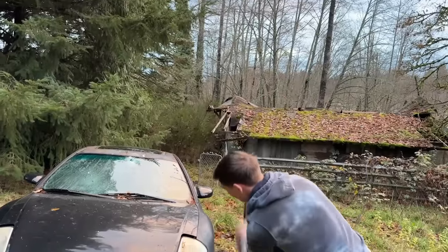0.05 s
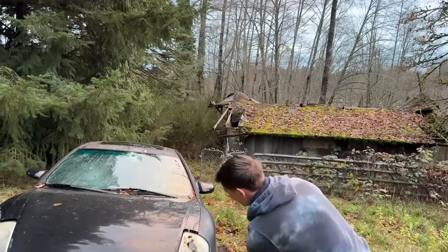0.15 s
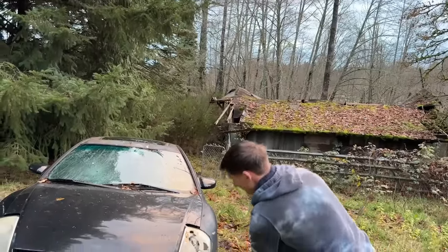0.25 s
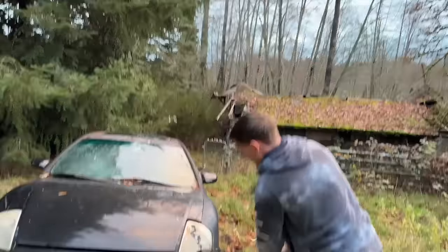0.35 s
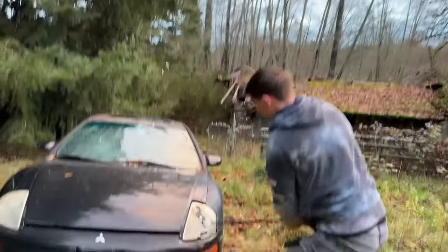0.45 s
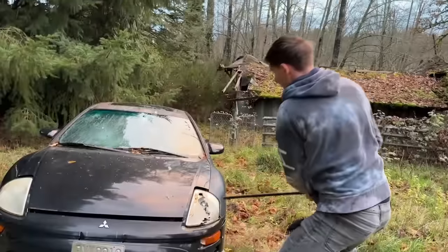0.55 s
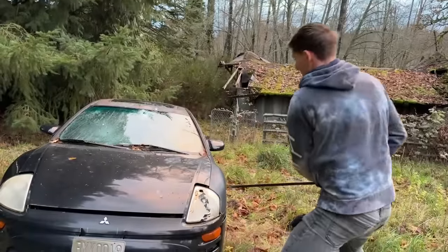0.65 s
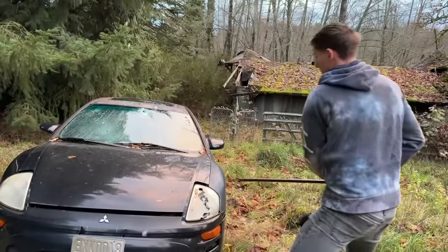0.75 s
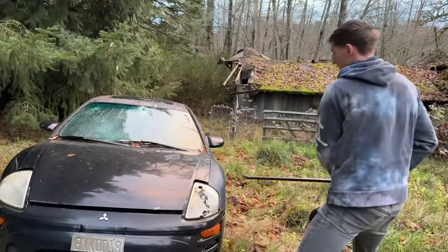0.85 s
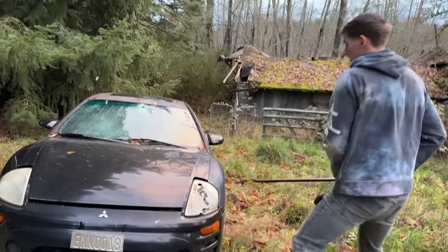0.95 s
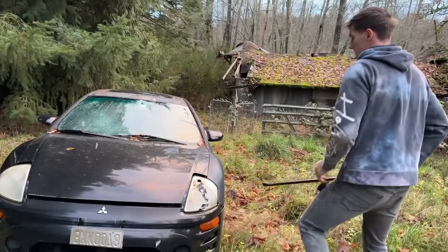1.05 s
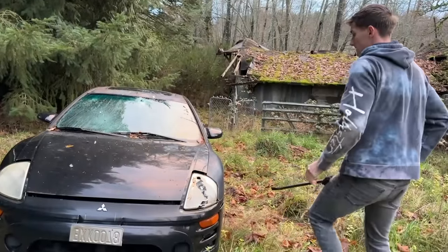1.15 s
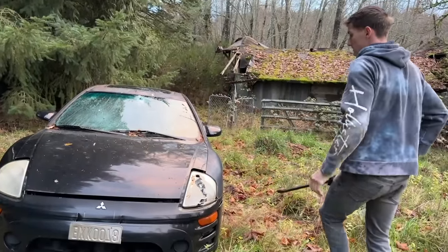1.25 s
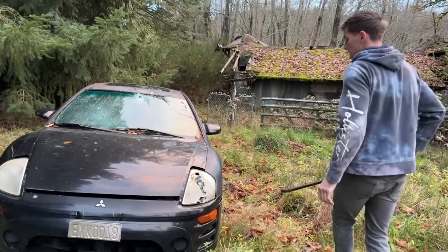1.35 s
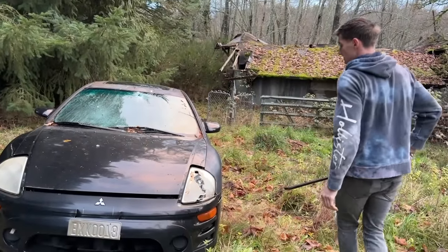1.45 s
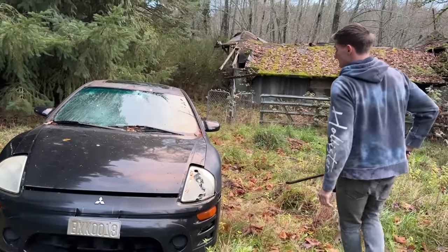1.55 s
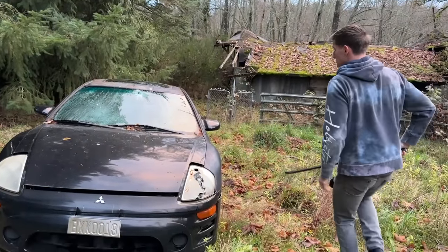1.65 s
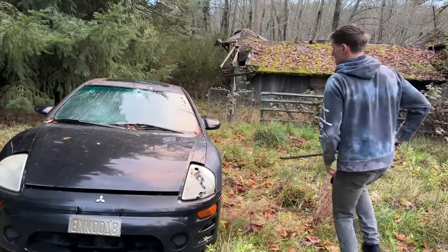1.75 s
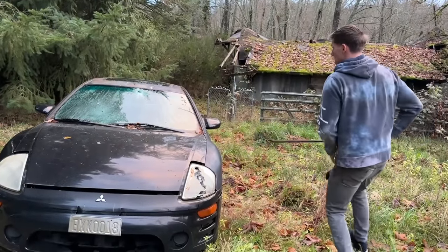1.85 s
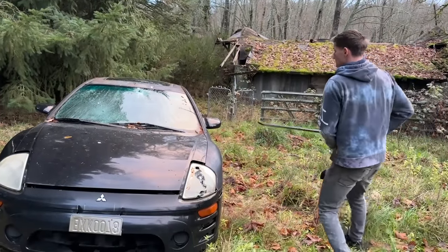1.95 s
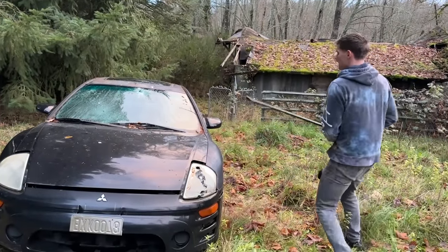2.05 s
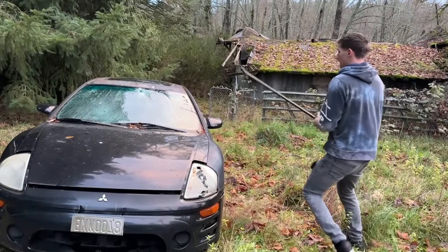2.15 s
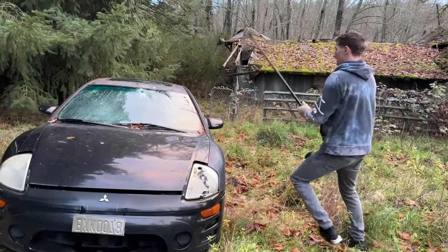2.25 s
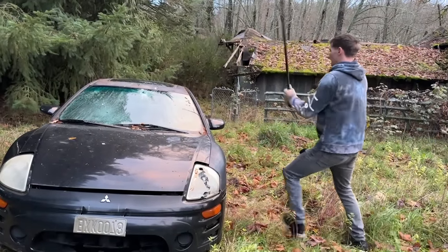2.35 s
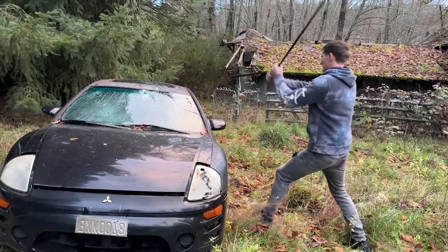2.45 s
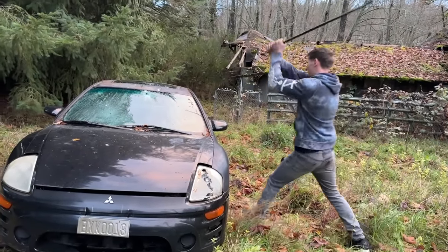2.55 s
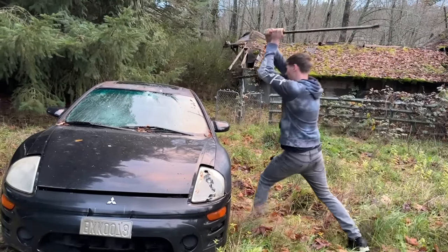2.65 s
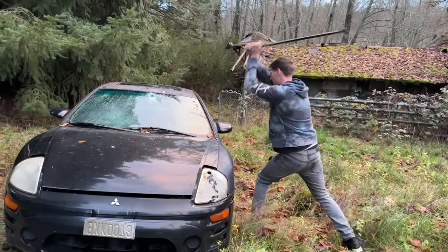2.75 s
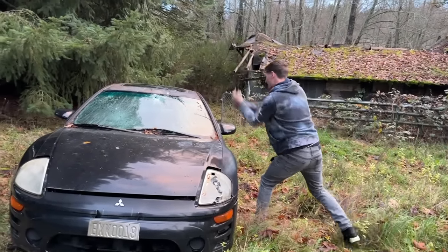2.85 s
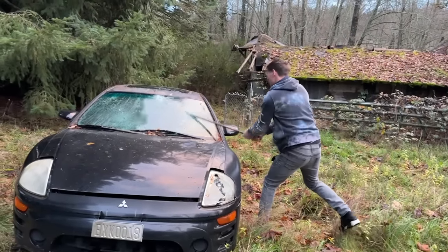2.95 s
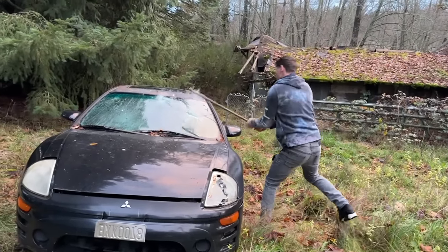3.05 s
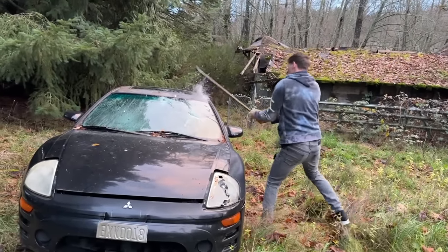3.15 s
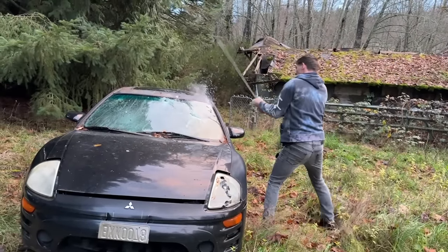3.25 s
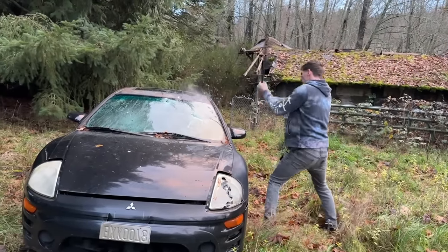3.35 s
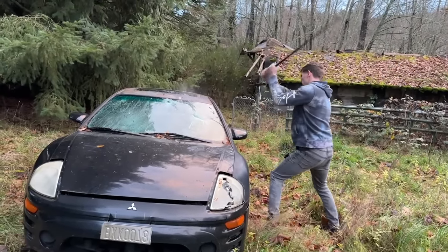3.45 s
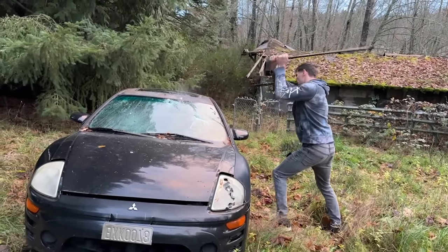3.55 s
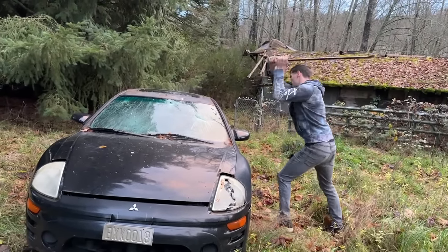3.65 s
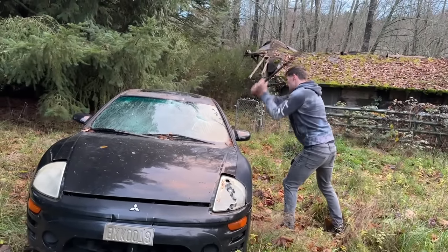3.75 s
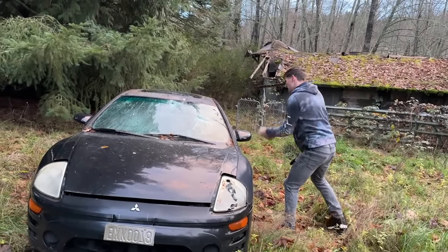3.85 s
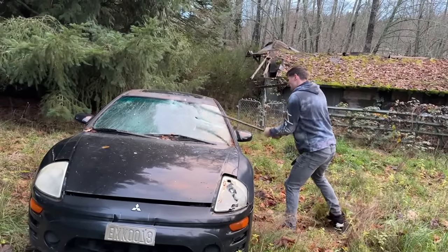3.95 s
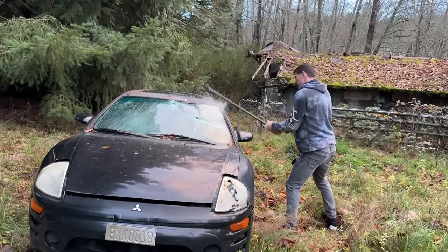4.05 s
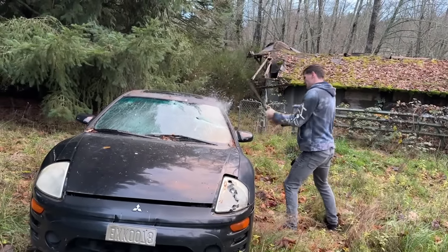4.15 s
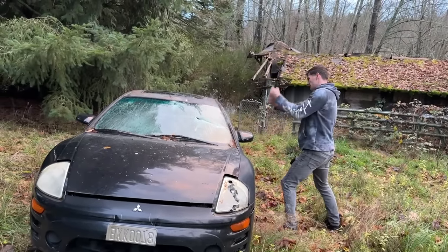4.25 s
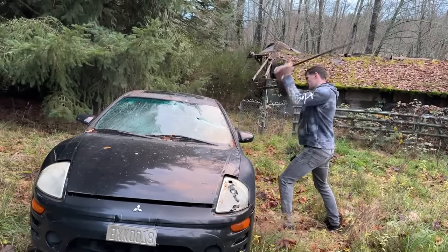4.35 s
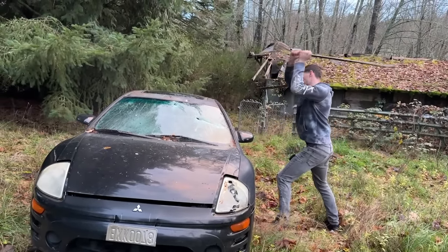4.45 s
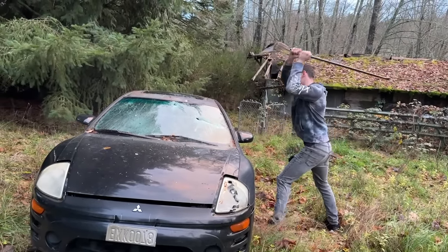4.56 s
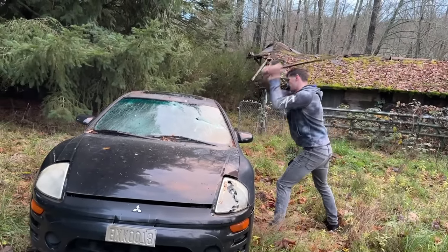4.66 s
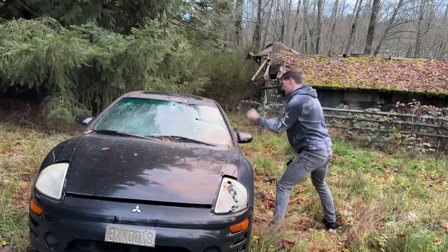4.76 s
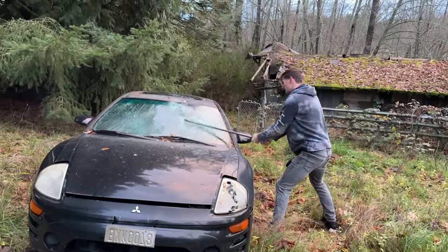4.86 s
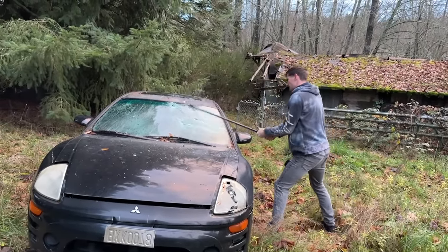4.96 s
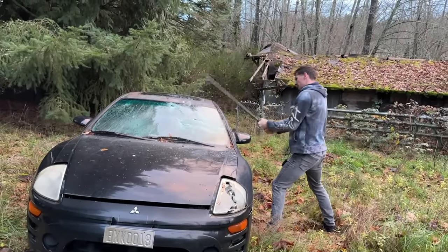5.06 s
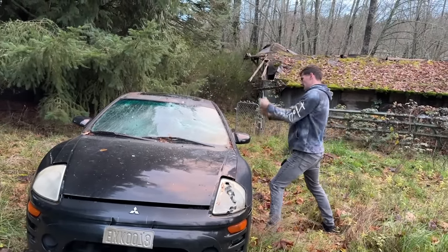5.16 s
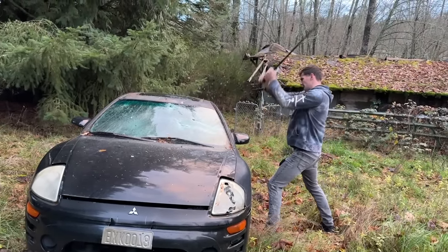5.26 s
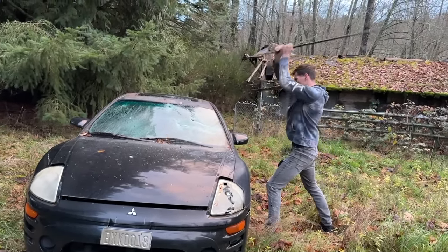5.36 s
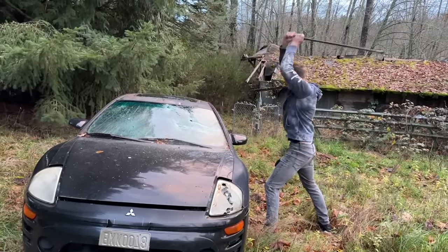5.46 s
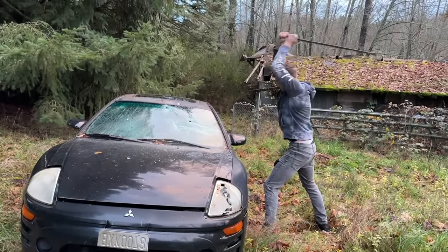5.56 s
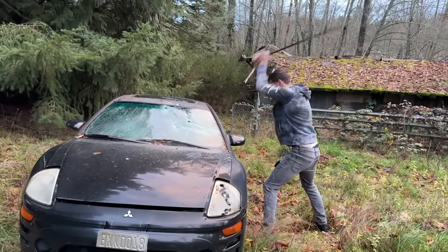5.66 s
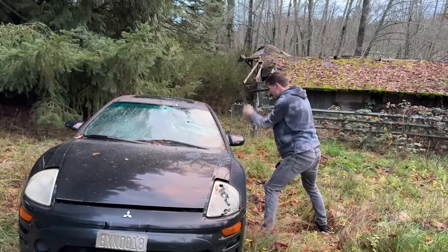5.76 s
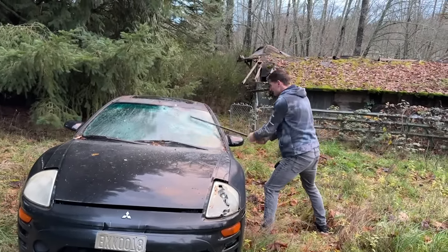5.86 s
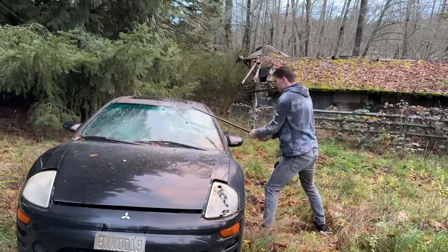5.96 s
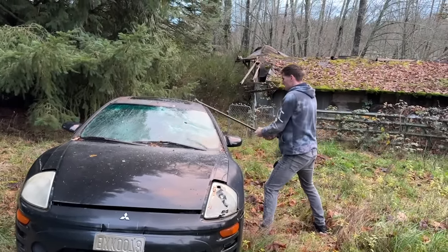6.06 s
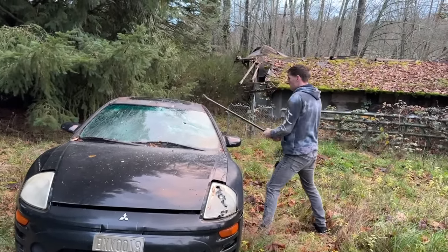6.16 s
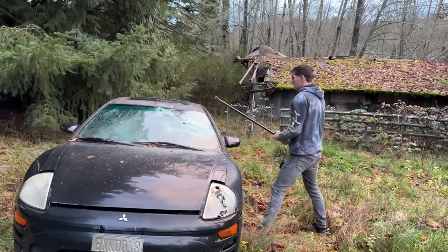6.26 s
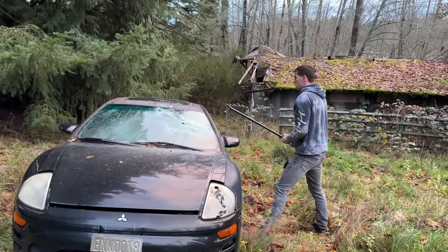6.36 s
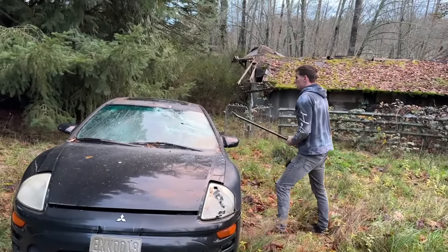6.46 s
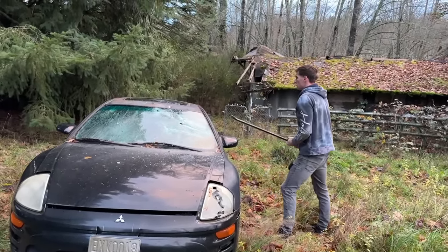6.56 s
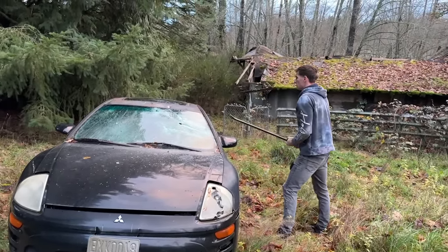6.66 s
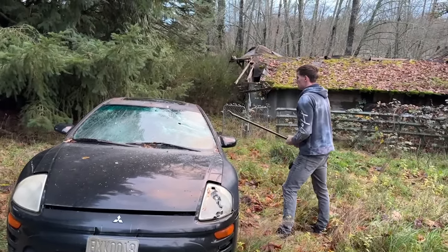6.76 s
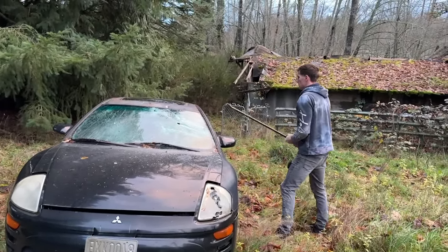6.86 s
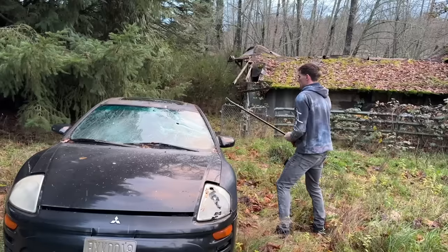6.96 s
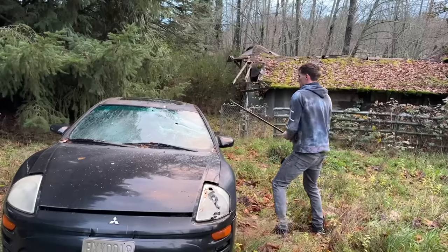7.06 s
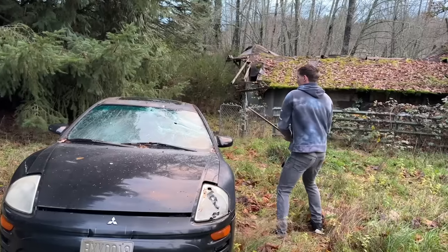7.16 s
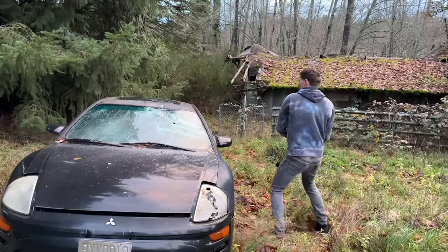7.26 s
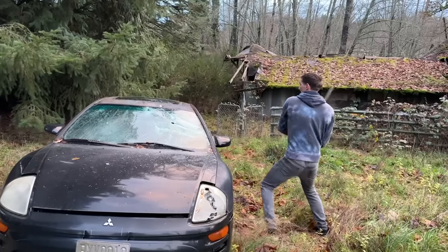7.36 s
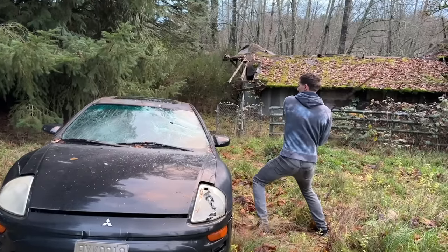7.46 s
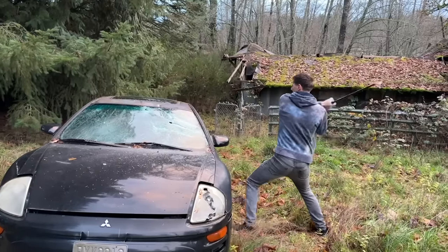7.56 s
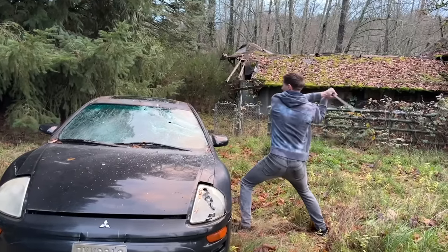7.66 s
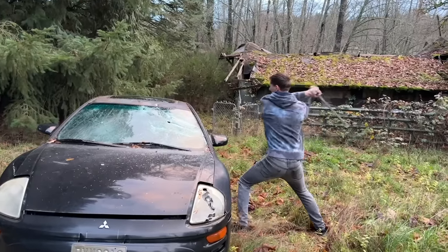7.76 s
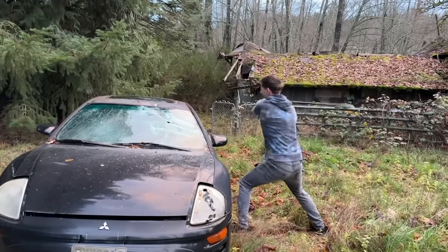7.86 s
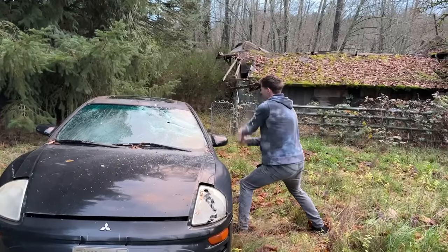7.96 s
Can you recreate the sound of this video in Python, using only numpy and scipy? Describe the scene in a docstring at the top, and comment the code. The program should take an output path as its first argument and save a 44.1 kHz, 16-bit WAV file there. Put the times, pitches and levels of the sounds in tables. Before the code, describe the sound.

A violent brittle crack of a breaking headlamp opens the scene, ringing briefly and echoing softly off nearby woods. Quiet grass steps and a small shard bouncing on sheet metal follow. Then four short, dry, crunching whacks hit laminated glass at a steady pace, each with a low hollow body and fine splinter hiss. It ends in rustling, footfalls, soft breeze and countryside hush, heard by a microphone near the car.

```python
"""A steel crowbar smashes a car's headlamp: dense clicks ring damped modes; pieces rattle, crumbs trickle.
Legs swish away through dry grass (filtered clicks) while a flying shard bounces on the bonnet.
Four heavy blows on the laminated windscreen follow: filtered clicks crunch, modes of pane and cabin ring.
Among them dry creaks (slip pulses in two resonances) and a small high bird (quivering sines) are heard.
Throughout: footfalls, rustling clothes, breeze and hush (noise), and echoes of a clearing by a wood."""
import sys
import numpy as np
from scipy import signal
from scipy.fft import rfft, irfft
from scipy.io import wavfile

SR = 44100
rng = np.random.default_rng(int(sys.argv[2]) if len(sys.argv) > 2 else 0)


def dump(signal):
    """Clip the signal to [-1, 1] and save it as 16-bit WAV at the path in sys.argv[1]."""
    limited = np.clip(np.atleast_2d(signal).T, -1, 1)
    pcm = np.round(limited * 32767).astype(np.int16)
    wavfile.write(sys.argv[1], SR, pcm)


N = 353135
TIME = np.arange(N) / SR  # s
AGE = np.arange(SR * 4 // 5) / SR  # s since the start of one event
SMASH_S = .1434  # the bar meets the headlamp

# blows on the windscreen: start_s, crunch_db, tilt_db_per_octave, shaft_lag_s, shaft_db, pane_db, flex_hz,
# cabin_db, cabin_tilt_db_per_octave, trim_db, splinters_db
BLOWS = [(2.9535, -14, 0.5, 0.0077, -8.5, -13, 369, -19.5, -4, -23, -34),
         (3.9005, -18, -0.5, 0.0098, -16, -14, 260, -14.5, 0, -19, -35.5),
         (4.8374, -11.5, 0, 0.009, -18, -10.5, 265, -21, 1, -21.5, -30.5),
         (5.8446, -12.5, 0.5, 0.0089, -19.5, -12.5, 337, -15.5, 5.5, -24.5, -35)]
# dull thump of ground and wing: frequency_hz, density_db
THUMP = [(25, -1), (60, -2.5), (120, 1), (200, -8.5), (400, -20), (1500, -37.5), (6000, -51),
         (16000, -65.5)]


def amp(db):
    """Decibels to gain."""
    return 10 ** (np.asarray(db) / 20)


def unit(x):
    """Scale to rms 1."""
    return x / np.sqrt(np.mean(x ** 2))


def fade(t60_s):
    """Exponential decay over the life of one event."""
    return np.exp(-np.log(1000) * AGE / t60_s)


def burst(hold_s, t60_s):
    """Full level for hold_s, then exponential decay."""
    return np.exp(-np.log(1000) * np.maximum(AGE - hold_s, 0) / t60_s)


def swell_at(middle_s, width_s):
    """A smooth rise and fall around middle_s."""
    return np.exp(-((TIME - middle_s) / width_s) ** 2)


def walk(rate_hz, size=N):
    """Slow random drift through rate_hz points per second, spread near 1."""
    count = int(rate_hz * size / SR) + 2
    return np.interp(TIME[:size] * rate_hz, np.arange(count), rng.standard_normal(count))


def add(out, start_s, x):
    """Mix x into out from start_s on."""
    i = max(int(start_s * SR), 0)
    out[i:i + len(x)] += x[:max(N - i, 0)]


def colour(x, points, tilt_db_per_octave=0, size=4096):
    """Causal minimum-phase filter through (Hz, dB) points that keeps the power of white noise."""
    hz, db = np.transpose(points)
    octave = np.log2(np.maximum(np.fft.rfftfreq(size, 1 / SR), 1))
    level_db = np.interp(octave, np.log2(hz), db) + tilt_db_per_octave * octave
    cepstrum = irfft(np.log(amp(level_db)))
    # fold the cepstrum onto its causal half
    cepstrum[1:size // 2] *= 2
    cepstrum[size // 2 + 1:] = 0
    response = irfft(np.exp(rfft(cepstrum)))
    return signal.fftconvolve(x, response / np.linalg.norm(response))[:len(x)]


def grains(rate_hz, spread_db, size=len(AGE)):
    """Clicks of uneven size and random sign at random moments, rms 1."""
    hit = rng.random(size) < rate_hz / SR
    sign = rng.choice([-1, 1], size)
    return unit(hit * sign * amp(spread_db * np.minimum(rng.exponential(size=size), 4)))


def ring(modes, detune):
    """Damped modes; each place of impact shifts them a little and flips some."""
    y = np.zeros(len(AGE))
    for hz, db, t60_s in modes:
        shift, flip = rng.standard_normal(2)
        tone = np.sin(2 * np.pi * hz * (1 + detune * shift) * AGE)
        y += np.sign(flip) * amp(db) * fade(t60_s) * tone
    return y / np.sqrt(sum(amp(db) ** 2 for _, db, _ in modes) / 2)


def headlamp(smash_db=-5.0, ring_db=-15, debris_db=-25, wing_db=-31):
    """The lens caves in over hundredths of a second; fractures ring the housing, wing thumps, pieces rattle."""
    # headlamp housing and the wing around it: mode_hz, relative_db, t60_s
    lamp_modes = [(208, -4.5, .06), (363, -11.5, 0.089), (526, -14.5, .08), (667.2, -8.5, 0.048),
                  (821, -9.5, .05), (1000, -8, 0.068), (1178, -8.5, 0.076), (1292, -9.5, .08),
                  (2074, 0, 0.056), (2373, 4.5, 0.041), (2410, 2.5, 0.03), (2640, 0, 0.02),
                  (2810, 0.5, 0.042), (3065, -6, 0.06), (3300, -10, 0.056), (3626, -4.5, 0.091),
                  (3760, -6, 0.056), (5900, -3.5, .05), (6195, -6, .04), (6650, -5, .035),
                  (6670, -5.5, 0.029)]
    # breaking lens: frequency_hz, density_db
    smash = [(30, -15), (70, -16.5), (110, -9), (210, 0.5), (300, -2.5), (900, -2.5), (1300, -1.5),
             (1650, -13), (2050, -6), (2400, -2.5), (3600, -3.5), (6500, -4), (9500, -12), (16000, -18)]
    fracture = grains(14000, 2.3) * burst(0.015, 0.08) * (1 - .55 * fade(0.032))
    housing = signal.fftconvolve(fracture, ring(lamp_modes, 0.0014))[:len(AGE)]
    housing /= np.sqrt(np.mean(housing[AGE < .03] ** 2))
    debris = colour(grains(5000, 9.8) * fade(.42), smash, tilt_db_per_octave=-2.5)
    wing = colour(grains(6700, 1.5) * fade(.3) * (1 - fade(.06)), THUMP)
    hit = amp(smash_db) * colour(fracture, smash) + amp(ring_db) * housing
    hit += amp(debris_db) * debris + amp(wing_db) * wing
    out = np.zeros(N)
    add(out, SMASH_S, hit)
    return out


def windscreen(flex_db=5, flex_t60_s=.025):
    """Hook punches the glass, shaft slaps down after it; pane and cabin ring, trim buzzes, splinters scatter."""
    # windscreen in its frame: mode_hz, relative_db, t60_s
    pane_modes = [(107.5, -6.5, 0.29), (136.6, -5, 0.091), (166, -3.5, 0.13), (230.7, 1, 0.098),
                  (262.4, 1, 0.093), (351, -6.5, 0.069), (397, -6, 0.074), (425.4, -7.5, 0.1),
                  (471.7, -1.5, 0.14), (554, 0.5, 0.051), (599, -4.5, 0.12), (662, -2, 0.099),
                  (792, -22.5, 0.043), (1210, -20, .05)]
    # air in the cabin and the body on its springs: mode_hz, relative_db, t60_s
    cabin_modes = [(33, -2.5, 0.32), (50, -5, 0.27), (80.6, -4, 0.28), (99, 5.5, 0.12), (130.1, -2.5, 0.22)]
    # glass under the hook, glass crushed along the shaft, splinters, trim: frequency_hz, density_db
    crunch = [(150, -10), (400, -4), (750, 1), (1100, 1.5), (1800, -0.5), (2600, 0.5), (4000, 1),
              (5000, -1), (6500, -0.5), (9000, -9), (12500, -11.5), (16000, -19)]
    crush = [(150, -7), (450, 6), (1100, -4), (2300, -7), (3500, 3.5), (6500, 2), (9000, -6), (16000, -17)]
    splinters = [(300, -1), (1200, 1.5), (2500, -5), (4000, 7), (6500, 4), (9000, 0.5), (15000, -19)]
    trim = [(30, -10), (60, -5.5), (110, -10), (200, 0.5), (360, -2.5), (700, -4), (1200, -13.5),
            (2200, -51), (6000, -54.5)]
    out = np.zeros(N)
    for (start_s, crunch_db, tilt_db, lag_s, shaft_db, pane_db, flex_hz,
         cabin_db, cabin_tilt_db, trim_db, splinters_db) in BLOWS:
        hook = grains(30000, 0.81) * burst(0.0021, 0.022)
        add(out, start_s, amp(crunch_db) * colour(hook, crunch, tilt_db))
        shaft = grains(12000, 2.2) * burst(0.00051, 0.058)
        add(out, start_s + lag_s, amp(shaft_db) * colour(shaft, crush, tilt_db))
        # the soft laminate swings in and out briefly while its modes swell
        flex = np.sin(2 * np.pi * flex_hz * AGE) * burst(0.0023, flex_t60_s) * (1 - fade(0.021))
        swell = 1 - fade(0.034)
        add(out, start_s, amp(pane_db) * (swell * ring(pane_modes, 0.025) + amp(flex_db) * flex))
        add(out, start_s, amp(trim_db) * colour(grains(2000, 2.2) * fade(0.22) * swell, trim))
        tilted = [(hz, db + cabin_tilt_db * np.log2(hz), t60_s) for hz, db, t60_s in cabin_modes]
        add(out, start_s + lag_s, amp(cabin_db) * ring(tilted, 0.024) * (1 - fade(0.05)))
        scatter = colour(grains(9000, 1.2) * fade(0.3), splinters)
        add(out, start_s + lag_s, amp(splinters_db) * scatter)
    return out


def snap(hz, t60_s, size=8192):
    """A brittle break: a dying cluster of clicks around one pitch."""
    hump = [(hz / 10, -19), (hz / 2, -3.5), (hz, 0), (hz * 2, -11), (hz * 6, -42)]
    return colour(grains(8000, 2.5, size=size) * fade(t60_s)[:size], hump)


def small_sounds():
    """Clicks through the sheet's colour for the shard, pitched clusters for snaps, dull bursts for footfalls."""
    # the shard on the bonnet: start_s, level_db, tilt_db_per_octave, t60_s
    bounces = [(.979, -59.5, 2.5, .1), (1.1108, -36.5, 4.5, 0.063), (1.1714, -42, 3, 0.051),
               (1.294, -54, 4, 0.071), (1.321, -49.5, 1.5, 0.095), (1.478, -59, 4, 0.081)]
    # bonnet sheet: frequency_hz, density_db
    bonnet = [(88, -46), (150, -37), (306, -15), (409, -13), (468, -11), (636, -7), (918, -8), (1270, -9),
              (2310, -19), (2600, -20), (3210, -20.5), (5400, -17), (15000, -43)]
    # loudest lone snaps of glass, twigs and stalks: start_s, level_db, centre_hz, t60_s
    snaps = [(0.099, -36, 644, 0.021), (0.099, -46, 5500, .02), (1.708, -51.5, 4800, 0.022),
             (2.567, -42, 1380, 0.025), (2.985, -31, 5500, .05), (3.73, -49, 8000, .04),
             (3.7594, -44, 7500, 0.029), (3.793, -42, 4500, 0.04), (4.275, -48, 1600, 0.012),
             (4.377, -44, 1200, 0.0085), (4.858, -25, 4540, 0.033), (4.887, -27.5, 5540, 0.043),
             (5.705, -45.5, 6500, 0.051), (5.7306, -42.5, 6500, 0.032), (6.3445, -41, 4000, 0.01),
             (7.337, -52.5, 3550, 0.029), (7.622, -53, 5000, 0.11)]
    # heavy footfalls on soft ground: start_s, level_db
    steps = [(0.016, -42.5), (0.058, -40.5), (0.106, -37), (2.893, -40.5), (3.407, -45), (4.22, -49),
             (5.224, -43.5), (5.39, -39.5), (7.221, -51.5), (7.972, -41)]
    out = np.zeros(N)
    for start_s, db, tilt_db, t60_s in bounces:
        tap = colour(grains(9000, 2.7) * fade(t60_s), bonnet, tilt_db)
        sheet = colour(grains(9000, 1.7) * fade(0.22), bonnet, tilt_db_per_octave=-5.0)
        add(out, start_s, amp(db) * (tap + amp(-6.0) * sheet))
    for start_s, db, hz, t60_s in snaps:
        add(out, start_s, amp(db) * snap(hz, t60_s))
    for start_s, db in steps:
        add(out, start_s, amp(db) * colour(grains(6000, 1.5) * burst(0.0085, 0.036), THUMP))
    return out


def creaks():
    """Dry stick-slip close by: uneven slips, each a short knock in two resonances."""
    # creaks: start_s, length_s, nominal_slips_hz, level_db, hollow_over_bright_db
    creak_list = [(3.291, 0.19, 46, -64, 7), (4.305, 0.039, 81, -54.5, 9.5), (5.105, 0.13, 105, -58, -0.5),
                  (5.463, 0.121, 140, -49, 18.5), (5.58, 0.065, 213, -55, 8)]
    # the two resonances: frequency_hz, density_db
    bright = [(300, -25), (1200, -2.5), (1800, 3.5), (2400, -4), (3300, -20), (8000, -30), (16000, -50)]
    hollow = [(150, -26), (350, -4.5), (480, 3), (700, -3.5), (1200, -8), (2000, -21.5), (6000, -42),
              (16000, -59)]
    out = np.zeros(N)
    for start_s, length_s, rate_hz, db, hollow_db in creak_list:
        gap, size = rng.standard_normal((2, 40))
        times_s = np.cumsum(np.exp(0.39 * gap)) / rate_hz
        times_s -= times_s[0]
        inside = times_s < length_s
        slips = np.zeros(len(AGE))
        slips[(times_s[inside] * SR).astype(int)] = amp(1.5 * size[inside])
        knocks = colour(slips, bright) + amp(hollow_db) * colour(slips, hollow)
        # rms over the length of the creak, not over the whole buffer
        add(out, start_s, amp(db) * unit(knocks) * np.sqrt(length_s * SR / len(AGE)))
    return out


def bird():
    """Short phrases of evenly spaced thin sines that sag a little mid-note and quiver most at their ends."""
    # phrases: start_s, notes, base_pitch_hz, level_db, quiver_share_of_pitch
    phrases = [(3.08, 3, 7800, -70, .012), (5.046, 1, 11100, -68, .004), (6.0, 1, 11150, -69, 0.0037),
               (6.352, 4, 7960, -62.5, .013)]
    note_s, note_every_s = .115, .16
    note_rise = .005  # share of the base pitch, per note
    out = np.zeros(N)
    u = np.linspace(0, 1, int(note_s * SR))
    ends = (2 * u - 1) ** 2
    for start_s, count, hz, db, quiver in phrases:
        for k in range(round(count)):
            bend = quiver * (2 * ends + (1 + ends) * walk(900, size=len(u)))
            pitch_hz = hz * (1 + k * note_rise + bend)
            level = amp(db + 2.83 * walk(70, size=len(u))) * (1 - ends) ** 0.3
            tone = np.sin(2 * np.pi * np.cumsum(pitch_hz) / SR)
            add(out, start_s + k * note_every_s, level * tone)
    return out


def rustling():
    """Strength of the rustle: stirring, a swish for each pace and lift, and crumbs trickling after each hit."""
    # clothes and grass between the swishes: time_s, level_db
    stirring = [(0, -66), (1.05, -82.5), (2.3, -78.5), (3.2, -71), (3.5, -63.5), (4.3, -69), (5.15, -63.5),
                (6.7, -66.5), (8, -71.5)]
    # sleeves rub as the bar is raised or lowered: middle_s, half_length_s, level_db
    lifts = [(3.662, 0.091, -66.5), (4.575, 0.12, -56.5), (5.51, 0.2, -64.5), (6.436, 0.22, -67.5),
             (7.25, 0.052, -71)]
    # stepping back from the car, the legs swish through the grass at an even pace
    pace_from_s, pace_every_s, pace_width_s, pace_db = 0.97, 0.3044, .055, -75
    lamp_crumbs_db, glass_crumbs_db, crumbs_t60_s = -44, -61, 1.2
    motion = amp(np.interp(TIME, *np.transpose(stirring)))
    for k in range(7):
        motion += amp(pace_db) * swell_at(pace_from_s + k * pace_every_s, pace_width_s)
    for middle_s, width_s, db in lifts:
        motion += amp(db) * swell_at(middle_s, width_s)
    add(motion, SMASH_S, amp(lamp_crumbs_db) * fade(crumbs_t60_s))
    for start_s, *_ in BLOWS:
        add(motion, start_s, amp(glass_crumbs_db) * fade(crumbs_t60_s))
    return motion


def ticking():
    """Stalks and crumbs tick at random, each at its own pitch, louder where the rustle is strong."""
    ticks_per_s, centre_hz, spread_octaves, t60_s = 15, 3900, .6, 0.02
    over_rustle_db, scatter_db = 7, 4
    out = np.zeros(N)
    for slot in range(int(ticks_per_s * N / SR)):
        start_s = (slot + rng.random()) / ticks_per_s
        pitch, size = rng.standard_normal(2)
        tick = snap(centre_hz * 2 ** (spread_octaves * pitch), t60_s)
        add(out, start_s, amp(scatter_db * size) * tick)
    return amp(over_rustle_db) * rustling() * out


def ambience(brisk_db=-55, brisk_power=1.5):
    """Noise for the breeze and the far hush of the countryside; dense clicks for rustling cloth and dry grass."""
    # breeze on the microphone and distant hush: time_s, level_db
    breeze_level = [(0, -60), (.8, -73), (3.2, -62.5), (5.5, -59), (6.7, -66.5), (8, -54.5)]
    hush_level = [(0, -60), (.5, -60.5), (1.05, -72), (1.6, -68), (2.4, -67.5), (4.6, -59.5), (6.8, -63.5),
                  (7.4, -58.5), (8, -61)]
    # hush, cloth lightly brushed, cloth briskly rubbed: frequency_hz, density_db
    air = [(20, -21), (50, -18), (130, -24.5), (216, -19), (280, -14), (370, -15), (500, -14.5),
           (950, -14.5), (1400, -24.5), (2500, -35), (3600, -34), (7000, -43.5), (12000, -56.5),
           (16000, -69)]
    brushed = [(700, -20.5), (1200, 1), (2300, -4.5), (4500, -2.5), (7000, -3.5), (10000, -11.5),
               (16000, -24)]
    rubbed = [(700, -21), (1200, 0), (2300, -4.5), (4500, -6), (6500, -1.5), (10500, -5), (13000, -7),
              (16000, -11)]
    wind = [(20, -7), (50, -0.5), (100, -3.5), (150, -7), (220, -13.5), (500, -35.5), (2000, -59.5)]
    # a low rumble swells around each swing
    swing_db, swing_width_s = -57.5, 0.12
    swings = swell_at(SMASH_S, swing_width_s) + sum(swell_at(s, swing_width_s) for s, *_ in BLOWS)
    strength = amp(np.interp(TIME, *np.transpose(breeze_level))) + amp(swing_db) * swings
    breeze = colour(rng.standard_normal(N), wind) * strength * amp(1.1 * walk(13))
    hush_db = np.interp(TIME, *np.transpose(hush_level)) + 0.75 * walk(8.8)
    hush = colour(rng.standard_normal(N), air) * amp(hush_db)
    motion = rustling() * amp(1.5 * walk(35))
    brush = amp(-3.0) * colour(grains(8000, 2.0, size=N), brushed)
    # the rub grows faster than the brush as the motion gets brisker
    briskness = (motion / amp(brisk_db)) ** (brisk_power - 1)
    rub = amp(-2.0) * colour(grains(12000, 3.3, size=N), rubbed) * briskness
    return breeze + hush + motion * (brush + rub)


def clearing(x, near_db, wood_db, wood_s=0.18, wood_width_s=.03):
    """Scatter from the ground and shed, then a soft late answer from the edge of the wood."""
    # ground and shed, then wood: frequency_hz, density_db
    near_echo = [(60, -8), (200, -2.5), (350, 2), (520, -1), (800, 1), (1600, -3), (3500, -6),
                 (6000, -10.5), (10000, -11), (16000, -16)]
    wood_echo = [(60, -18), (200, -4.5), (380, 5.5), (800, 2.5), (1600, -6.5), (3500, -5.5), (6000, -4),
                 (10000, -8.5), (16000, -11)]
    near = fade(0.34) * (1 - fade(.1))
    late = np.exp(-(np.minimum(AGE - wood_s, 0) / wood_width_s) ** 2) * burst(wood_s, .6)
    response = amp(near_db) * unit(colour(near * grains(9000, 2.5), near_echo))
    response += amp(wood_db) * unit(colour(late * grains(8100, 2.6), wood_echo))
    return signal.fftconvolve(x, response / np.sqrt(len(AGE)))[:N]


def scene():
    """All sources; the headlamp faces the open field, the windscreen throws its sound upwards."""
    lamp, glass, small = headlamp(), windscreen(), small_sounds()
    echoes = clearing(lamp, near_db=-17.5, wood_db=-30.5)
    echoes += clearing(glass + small, near_db=-23, wood_db=-47.5)
    return (lamp + glass + small + echoes + creaks() + bird() + ambience() + ticking())[None]


def record(dry):
    """The microphone rounds the hardest peaks; a steep low-pass cuts the top."""
    top_hz = 15900
    rounded = 1.138 * np.tanh(dry / 1.023)
    return signal.sosfilt(signal.ellip(8, .2, 70, top_hz, fs=SR, output="sos"), rounded)


dry = scene()
out = record(dry)
dump(out)
```